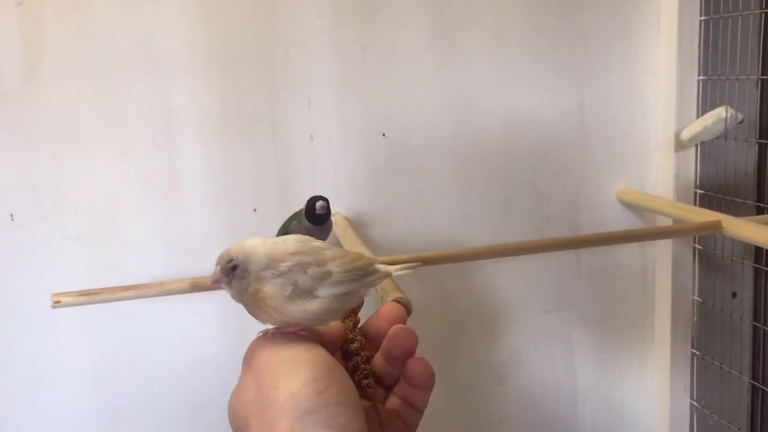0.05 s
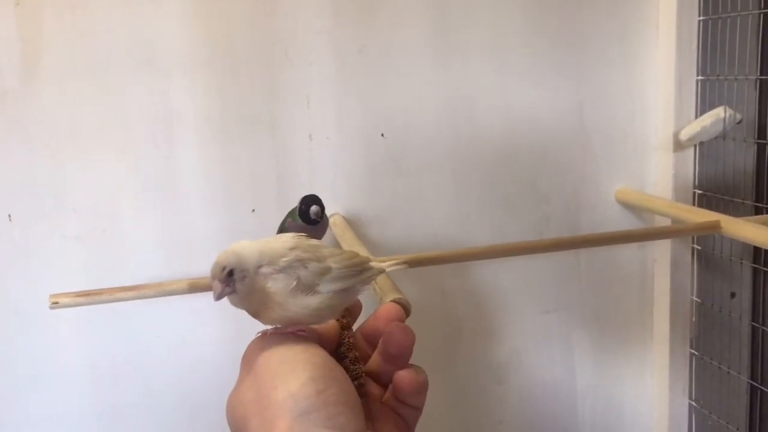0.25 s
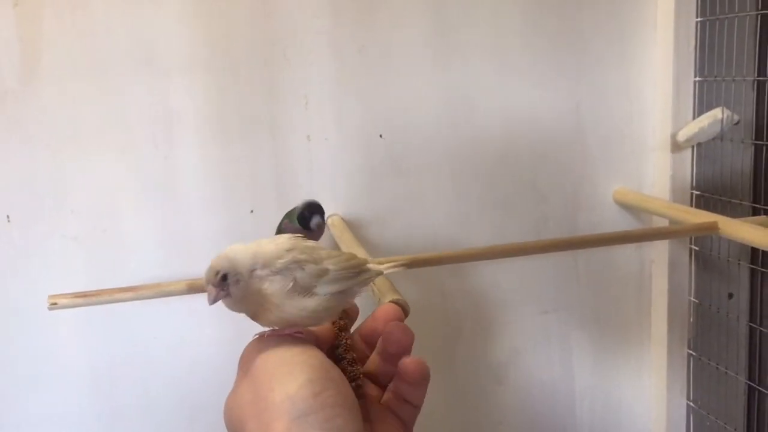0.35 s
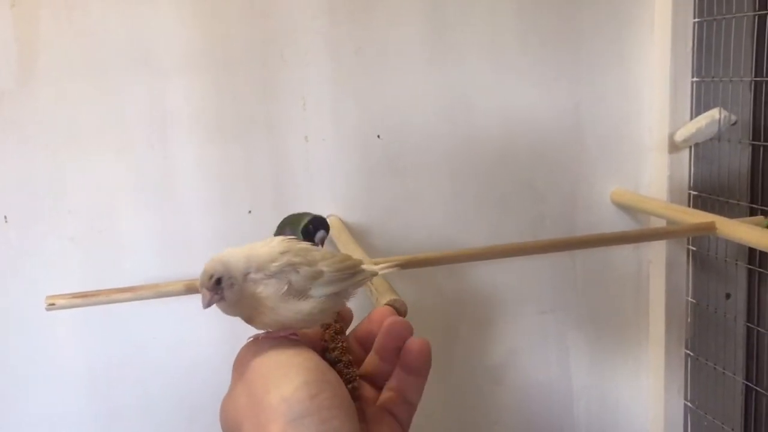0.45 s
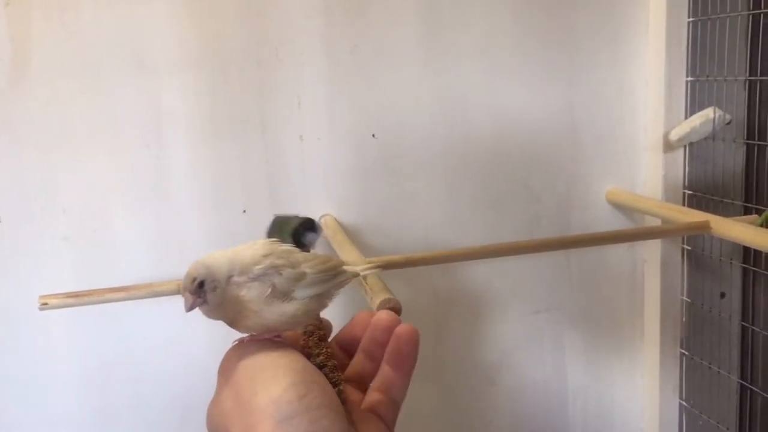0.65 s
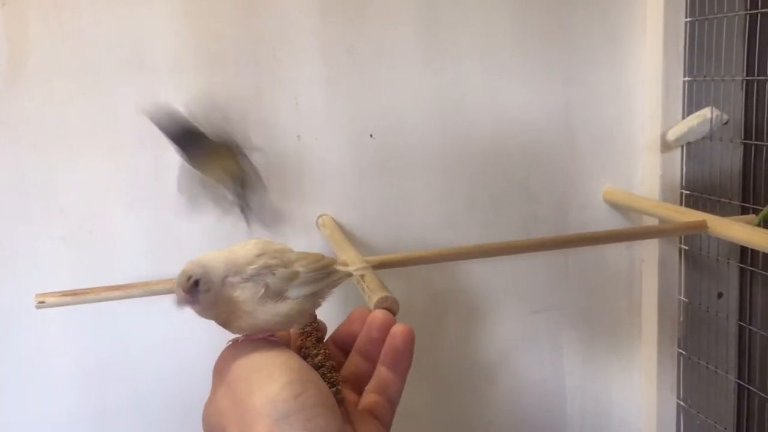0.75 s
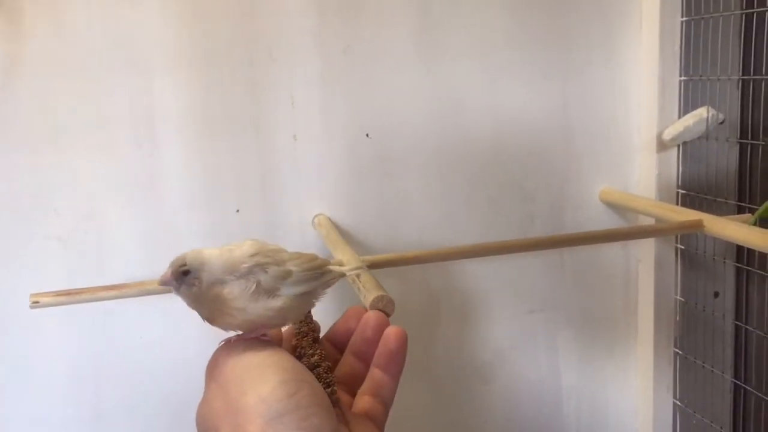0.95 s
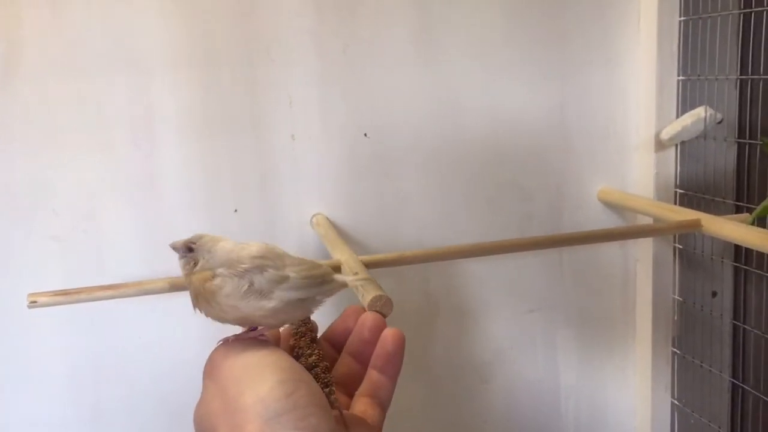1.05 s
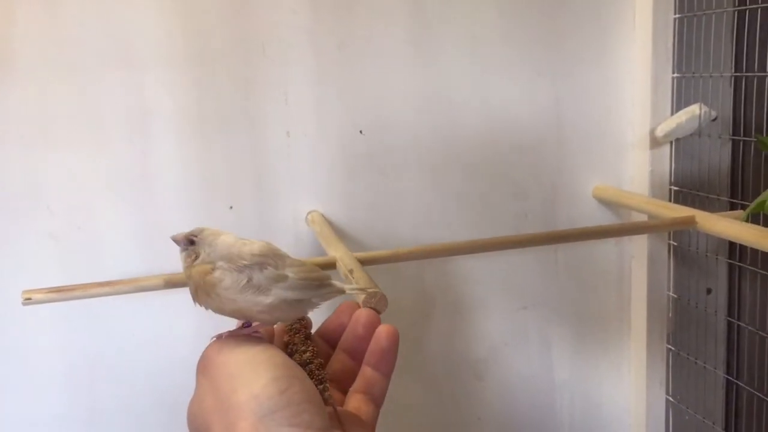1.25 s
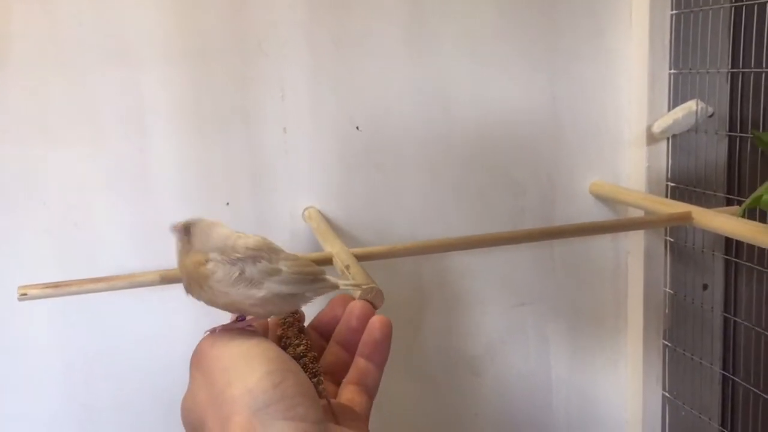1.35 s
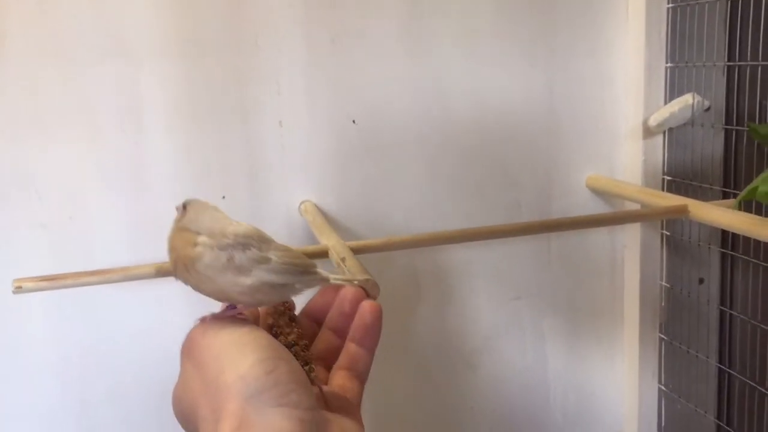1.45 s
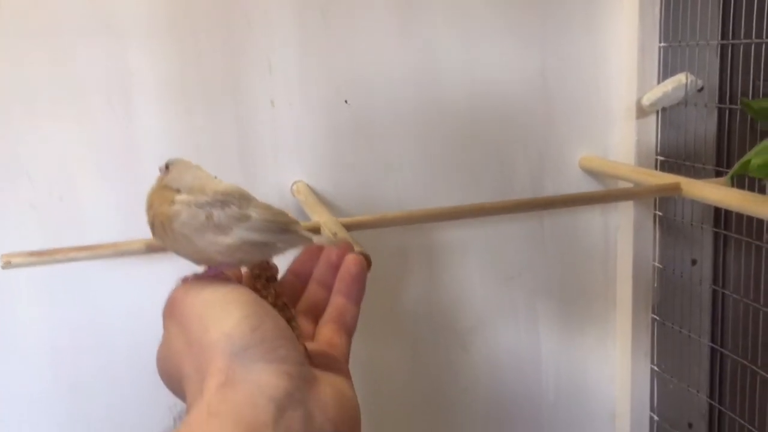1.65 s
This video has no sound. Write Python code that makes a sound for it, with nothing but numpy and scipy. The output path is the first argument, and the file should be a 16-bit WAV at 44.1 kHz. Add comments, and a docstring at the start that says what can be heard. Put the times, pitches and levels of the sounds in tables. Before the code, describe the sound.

A close finch call leads: a snap at 0.2 seconds opens a piercing, hoarse, slightly falling chirp, fraying into rasp until 0.6. The perch shuffles softly, then a dry snap near 0.8 starts the take-off, with quick, low air puffs and feathery swishes until about 1.25. Faint high peeps continue behind, a perch bumps at 1.4, and quiet room noise remains, with short bare-wall reflections.

```python
"""Finches in a small indoor aviary

One close bird gives a long, hoarse, two-voiced call (jittered tones frayed by noise, plus hiss) and takes off;
its wingbeats are puffs of air with swishes of filtered noise. Other finches peep farther away as short glides,
with soft low tones, a faint nasal call and dry snaps. Perches bump, shuffle and hum over a noise floor.
Bare walls return quick reflections and a decaying noise tail."""
import sys
import numpy as np
from scipy import signal
from scipy.fft import rfft, irfft
from scipy.io import wavfile
from scipy.ndimage import uniform_filter1d

SR = 44100
rng = np.random.default_rng(int(sys.argv[2]) if len(sys.argv) > 2 else 0)


def output_pcm(signal):
    """Save a mono or channel-first signal as 16-bit PCM at the path in sys.argv[1].

    Samples are clipped to [-1, 1] before scaling.
    """
    pcm = np.clip(np.atleast_2d(signal).T, -1, 1) * 32767
    wavfile.write(sys.argv[1], SR, np.round(pcm).astype(np.int16))


N = 74970
T = np.arange(N) / SR  # s

# noise colour of snaps and brushing feathers: (frequency [Hz], level [dB])
SNAP_SPECTRUM = [(200, -14.5), (1200, 2.5), (2700, 7), (5500, 2.5), (16000, -7.5)]

JITTER_HZ, FRAY_HZ = 330, 320  # rate of pitch wobble, half width of the hoarse band
WING_ROOM_DB = -12.5  # tail relative to direct sound, wings and snaps


def amp(db):
    """Decibels to gain."""
    return 10 ** (np.asarray(db) / 20)


def unit(x):
    """Scales to rms 1."""
    return x / np.sqrt(np.mean(x ** 2) + 1e-20)


def read(points, hz):
    """Reads a spectrum on a log-frequency axis."""
    f, value = np.transpose(points)
    return np.interp(np.log(hz + 1), np.log(f + 1), value)


def level(points):
    """Gain over time from rows that start with a time and end with a level; silent outside."""
    rows = np.array(points)
    return amp(np.interp(T, rows[:, 0], rows[:, -1], left=-140, right=-140))


def add(mix, s, sound):
    """Mixes a sound in at a time, cut at the end of the mix."""
    part = mix[max(round(s * SR), 0):][:len(sound)]
    part += sound[:len(part)]


def noise(points, tilt_db=0):
    """Coloured noise, rms 1, tilted in dB per octave above 300 Hz."""
    hz = np.fft.rfftfreq(N, 1 / SR)
    gain_db = read(points, hz) + tilt_db * np.log2(np.maximum(hz, 300))
    return unit(irfft(rfft(rng.standard_normal(N)) * amp(gain_db), N))


def wander(rate_hz):
    """Smooth chance, rms 1, up to a rate."""
    hz = np.fft.rfftfreq(N, 1 / SR)
    return unit(irfft(rfft(rng.standard_normal(N)) / (1 + (hz / rate_hz) ** 4), N))


def patchy(x, depth_db, size=256):
    """Breaks a noise into brief flecks, each at its own pitch, by random gains over time and frequency."""
    patch_s, patch_hz = .008, 550
    overlap = size * 3 // 4
    hz, t, z = signal.stft(x, SR, nperseg=size, noverlap=overlap)
    flecks = uniform_filter1d(rng.standard_normal(z.shape), round(patch_hz / hz[1]), axis=0)
    flecks = unit(uniform_filter1d(flecks, round(patch_s / t[1]), axis=1))
    flecked = signal.istft(z * amp(depth_db * flecks), SR, nperseg=size, noverlap=overlap)[1]
    return unit(flecked[:N])


def near_walls(x, count=10):
    """Adds a few quick reflections from the closest walls, of random delay and sign."""
    latest_s, early_db = .01, -6
    taps = np.zeros(SR // 10)
    delays = (rng.uniform(.1, 1, count) * latest_s * SR).astype(int)
    taps[delays] = rng.choice([-1, 1], count) / np.sqrt(count)
    return x + amp(early_db) * signal.fftconvolve(x, taps)[:N]


def room(x, wet_db):
    """Adds a dense noise tail from the walls, with a decay time set by frequency."""
    # wall reverberation: (frequency [Hz], t60 [s])
    decay_times = [(100, 0.12), (500, 0.64), (2500, 0.29), (9000, 0.25)]
    hz, t, z = signal.stft(rng.standard_normal(SR // 2), SR, nperseg=256)
    decay = amp(-60 * t / read(decay_times, hz)[:, None])
    tail = signal.istft(z * decay, SR, nperseg=256)[1]
    tail[:SR // 250] = 0  # tail starts after 4 ms
    wet = signal.fftconvolve(x, tail / np.linalg.norm(tail))[:N]
    return (x + amp(wet_db) * wet) / np.hypot(1, amp(wet_db))


def notes(rows, jitter, rate_hz):
    """Short gliding tones that swell and fade, with pitch jitter as a share of pitch."""
    out = np.zeros(N)
    for start, length, from_hz, to_hz, db in rows:
        u = np.linspace(0, 1, int(length * SR))
        hz = from_hz * (to_hz / from_hz) ** u * (1 + jitter * wander(rate_hz)[:len(u)])
        swell = abs(np.sin(np.pi * u)) ** 0.33
        add(out, start, amp(db) * unit(swell * np.sin(2 * np.pi * np.cumsum(hz) / SR)))
    return out


def still_air():
    """Steady coloured noise of the room."""
    # noise colour: (frequency [Hz], level [dB])
    spectrum = [(25, -16), (152, -2.5), (495, -12.5), (895, -13.5), (2560, -13.5), (15500, -27.5)]
    return amp(-69) * noise(spectrum)


def perch():
    """Low shuffling noise, dull gliding bumps and the unsteady hum of a shaken perch."""
    # hum: (time [s], level [dB])
    hum_level = [(.9, -66), (1.02, -52.5), (1.25, -54.5), (1.35, -84), (1.5, -68), (1.62, -59), (1.7, -64)]
    # bumps: (time [s], length [s], start [Hz], end [Hz], level [dB])
    bump_notes = [(.012, 0.02, 264, 85, -48), (.025, 0.055, 81.4, 60.5, -66), (.505, 0.13, 131.3, 120, -56),
                  (.725, .05, 70, 58, -65), (1.41, .038, 127, 128, -44), (1.452, 0.057, 178, 168, -56)]
    # shuffling: (time [s], level [dB])
    shuffle_level = [(0, -54), (.04, -68.5), (.1, -81.5), (.492, -75.5), (.507, -57.5), (.575, -52.5),
                     (.64, -64), (.76, -64), (.86, -53.5), (1.25, -79), (1.33, -66), (1.7, -62)]
    # shuffling colour: (frequency [Hz], level [dB])
    shuffle_spectrum = [(60, -8.5), (130, -3), (360, -10.5), (570, -12.5), (780, -22.5), (1400, -45.5),
                        (4000, -40)]
    hum_hz = 172.9 * (1 + 0.015 * wander(23))
    hum = level(hum_level) * unit(np.sin(2 * np.pi * np.cumsum(hum_hz) / SR))
    bumps = notes(bump_notes, jitter=.04, rate_hz=70)
    return level(shuffle_level) * noise(shuffle_spectrum) + bumps + hum


def low_tones():
    """Soft low gliding tones in the room."""
    # (time [s], length [s], start [Hz], end [Hz], level [dB])
    tones = [(0, 0.082, 428, 422, -71.5), (.495, 0.17, 477, 446.7, -60.5), (.558, 0.024, 930, 944, -70),
             (.67, 0.087, 552.8, 582, -63.5), (.714, 0.031, 591, 585, -55.5),
             (.724, 0.015, 890, 960, -67.5), (1.385, 0.07, 1123, 1098, -68)]
    return room(notes(tones, jitter=.028, rate_hz=130), wet_db=-11)


def nasal_call():
    """Faint nasal call: a stack of partials gliding together."""
    # (time [s], length [s], start [Hz], end [Hz])
    start, length, from_hz, to_hz = (1.58, 0.0494, 1490, 1430)
    # partials: (multiple of the pitch, level [dB])
    partials = [(1, -69.5), (3, -78.5), (3.5, -70.5), (4, -69)]
    rows = [(start, length, k * from_hz, k * to_hz, db) for k, db in partials]
    return notes(rows, jitter=.02, rate_hz=JITTER_HZ)


def other_finches():
    """Peeps as jittered glides, with the nasal call, returned by the walls."""
    # peeps: (time [s], length [s], start [Hz], end [Hz], level [dB])
    peeps = [(0, 0.046, 6830, 7460, -62), (.187, 0.036, 6230, 6500, -65.5), (.78, 0.043, 5000, 5500, -63.5),
             (.94, 0.062, 4800, 4850, -66), (1.07, 0.077, 4700, 5400, -65.5),
             (1.18, 0.098, 4830, 5100, -63.5), (1.243, 0.033, 5500, 5900, -62),
             (1.389, 0.0073, 2830, 2780, -57.5), (1.405, 0.012, 5200, 5190, -61.5)]
    calls = notes(peeps, jitter=.04, rate_hz=700) + nasal_call()
    return room(near_walls(calls), wet_db=-7)


def snaps():
    """Claw, beak and wing-tip snaps: noise with a short rise and exponential decay."""
    # (time [s], level [dB], decay [s], brightness [dB per octave])
    events = [(0.2255, -41.5, 0.0039, 4.5), (0.776, -48.5, 0.0039, -8.5), (0.8182, -41, 0.0045, 1),
              (1.057, -52, 0.0058, -6.5), (1.103, -56, 0.0049, -6), (1.141, -54.5, 0.00099, -3)]
    rise_s = 0.0032
    out = np.zeros(N)
    for s, db, decay_s, tilt_db in events:
        t = np.maximum(T - s, 0)
        rise = np.minimum(t / rise_s, 1)
        decay = np.exp(-np.maximum(t - rise_s, 0) / decay_s)
        out += amp(db) * rise * decay * noise(SNAP_SPECTRUM, tilt_db)
    return room(near_walls(out), WING_ROOM_DB)


def puff(t, hz):
    """Air pushed and then drawn back by one wing stroke: a skewed cosine under a Gaussian."""
    width_s, skew_rad = 0.0027, 0.66
    return np.exp(-.5 * (t / width_s) ** 2) * np.cos(2 * np.pi * hz * t + skew_rad)


def wings():
    """Each beat is a downstroke and an upstroke of air with a swish of feathers; brushing runs alongside."""
    # wingbeats: (time [s], air puff level [dB], feather swish level [dB])
    beats = [(0.838, -53, -41.5), (0.863, -40.5, -57.5), (0.883, -44.5, -44.5), (0.923, -51, -53.5),
             (0.985, -42.5, -64), (1.029, -37.5, -48), (1.07, -36.5, -48), (1.111, -37.5, -48.5),
             (1.149, -38, -44), (1.192, -35.5, -44.5), (1.233, -40.5, -47)]
    # swish colour: (frequency [Hz], level [dB])
    swish_spectrum = [(30, -7.5), (200, 9.5), (400, 0.5), (620, -0.5), (900, -9.5), (3000, -21),
                      (6000, -28), (16000, -30.5)]
    # feathers brushing: (time [s], level [dB])
    brush_level = [(.785, -66.5), (.835, -53.5), (.88, -64), (.93, -79), (.99, -60.5), (1.04, -67.5),
                   (1.15, -60.5), (1.32, -78)]
    down_hz, up_hz, up_delay_s, up_db = 126, 63.6, 0.016, 0.5
    swish_lead_s, swish_decay_s, patchy_db = 0.0063, 0.0097, 4.5
    air, swish = np.zeros(N), np.zeros(N)
    for s, puff_db, swish_db in beats:
        downstroke = puff(T - s, down_hz)
        upstroke = amp(up_db) * puff(T - s - up_delay_s, up_hz)
        air += amp(puff_db) * (downstroke + upstroke)
        swish += amp(swish_db) * np.exp(-abs(T - s + swish_lead_s) / swish_decay_s)
    feathers = swish * patchy(noise(swish_spectrum), patchy_db)
    brushing = level(brush_level) * patchy(noise(SNAP_SPECTRUM), patchy_db)
    return air + room(near_walls(feathers + brushing), WING_ROOM_DB)


def voice(points, jitter, hoarse, octave=0):
    """Syrinx whistle, perhaps with its octave, that frays into a band of noise when hoarse."""
    shimmer_db, flutter_hz = 5, 150
    s, pitch_hz, _ = np.transpose(points)
    hz = np.interp(T, s, pitch_hz) * (1 + jitter * wander(JITTER_HZ))
    turn = np.exp(2j * np.pi * np.cumsum(hz) / SR)
    fray = np.sqrt(1 - hoarse) + np.sqrt(hoarse / 2) * (wander(FRAY_HZ) + 1j * wander(FRAY_HZ))
    flutter = unit(amp(shimmer_db * np.tanh(wander(flutter_hz))))
    return level(points) * flutter * np.sqrt(2) * (fray * (turn + octave * turn ** 2)).imag


def call():
    """Close finch: two voices and flecked hiss; the undertone throws sidebands off the upper voice."""
    # upper voice: (time [s], pitch [Hz], level [dB])
    upper_points = [(.212, 4645, -65), (.228, 4000, -41.5), (.237, 5000, -43), (.247, 6050, -40),
                    (.27, 6150, -31.5), (.285, 6513, -36), (.308, 6143, -35), (.335, 5950, -36.5),
                    (.362, 5980, -33.5), (.392, 5750, -29.5), (.412, 5550, -38), (.44, 5450, -51),
                    (.45, 5570, -31.5), (.46, 5400, -48), (.52, 5350, -44), (.531, 5680, -36),
                    (.55, 5620, -40), (.557, 5520, -43), (.592, 5400, -49)]
    # upper voice hoarseness: (time [s], share of noise [0-1])
    hoarse_points = [(.24, .45), (.265, .06), (.385, .14), (.41, .55), (.435, .65), (.45, .03), (.468, .85),
                     (.52, .75), (.54, .12), (.58, .65)]
    # upper voice octave, brightest as the beak snaps open: (time [s], relative level [dB])
    octave_points = [(.233, -2.5), (.262, -19), (.31, -13), (.37, -27.5), (.55, -21.5)]
    # lower voice, in short patches as the call ends: (time [s], length [s], start [Hz], end [Hz], level [dB])
    lower_notes = [(.455, 0.023, 5100, 4000, -47), (.474, 0.025, 4063, 4250, -43.5),
                   (.498, .04, 3240, 3647, -51), (.53, .022, 3240, 3020, -49.5),
                   (.55, 0.029, 2630, 2158, -57.5), (.572, 0.0086, 4185, 4260, -47)]
    # faint undertone: (time [s], pitch [Hz], level [dB])
    under_points = [(.262, 2750, -70), (.283, 2420, -54), (.32, 2062, -68.5), (.36, 2750, -63.5),
                    (.415, 2540, -55), (.435, 2640, -68.5), (.495, 2393, -62)]
    # hiss colour: (frequency [Hz], density [dB per Hz])
    rasp_spectrum = [(1300, -55), (2000, -29), (2600, -4.5), (3300, -6), (4100, 3.5), (5500, -1),
                     (7200, -7), (8700, -6.5), (16000, -26)]
    # hiss: (time [s], level [dB])
    rasp_level = [(.215, -63), (.24, -58), (.32, -54.5), (.44, -54.5), (.5, -56.5), (.578, -53),
                  (.596, -61)]
    lower_shimmer_db, coupling_db = 5.5, -24

    hoarse = np.interp(T, *np.transpose(hoarse_points))
    octave = amp(np.interp(T, *np.transpose(octave_points)))
    upper = voice(upper_points, .016, hoarse, octave)
    shimmer = unit(amp(lower_shimmer_db * np.tanh(wander(FRAY_HZ))))
    lower = notes(lower_notes, jitter=.03, rate_hz=JITTER_HZ) * shimmer
    under = voice(under_points, jitter=.04, hoarse=.2)
    sidebands = amp(coupling_db) * upper * under / abs(under).max()
    rasp = level(rasp_level) * patchy(noise(rasp_spectrum), depth_db=3.5)
    return room(near_walls(upper + lower + under + sidebands + rasp), wet_db=-7)


def scene():
    """All the birds over the still air of the room."""
    background = still_air() + perch() + low_tones() + other_finches()
    return (background + snaps() + wings() + call())[None]


def record(dry):
    """The microphone drops the deepest bass; then the band limit."""
    bass_cut_hz, band_limit_hz = 38, 15800
    hz = np.fft.rfftfreq(2 * N, 1 / SR)
    bass_cut = 1 - 1 / (1 + (hz / bass_cut_hz) ** 6)
    thin = irfft(rfft(dry, 2 * N) * bass_cut)[:, :N]
    lowpass = signal.firwin(511, band_limit_hz, window=("kaiser", 9), fs=SR)
    return signal.oaconvolve(thin, lowpass[None], "same")


dry = scene()
out = record(dry)
output_pcm(out)
```